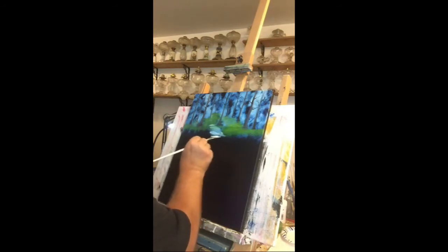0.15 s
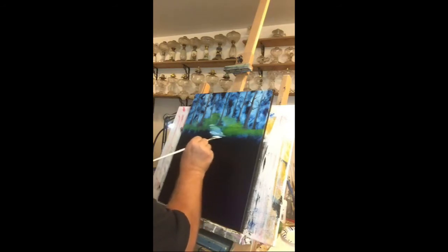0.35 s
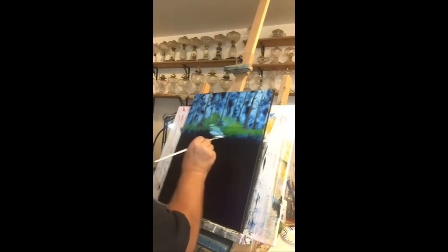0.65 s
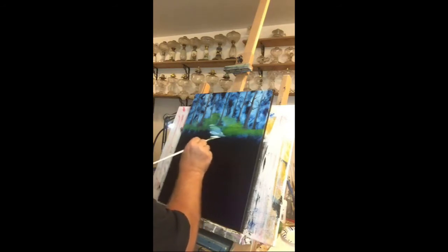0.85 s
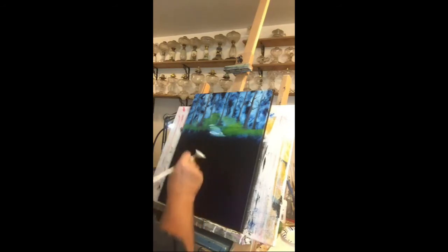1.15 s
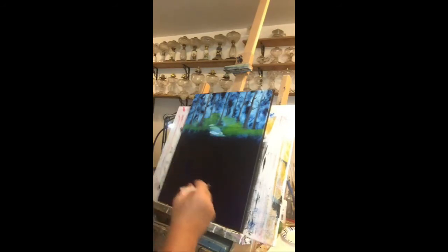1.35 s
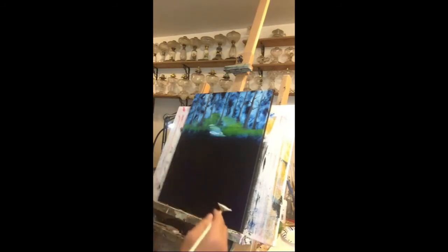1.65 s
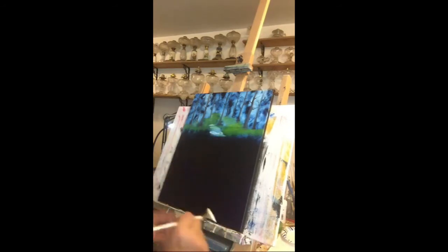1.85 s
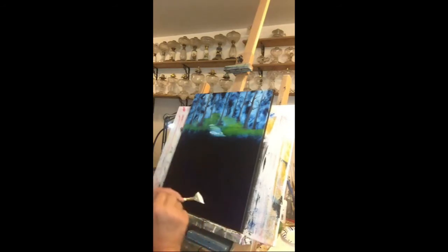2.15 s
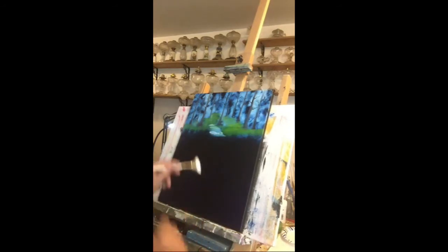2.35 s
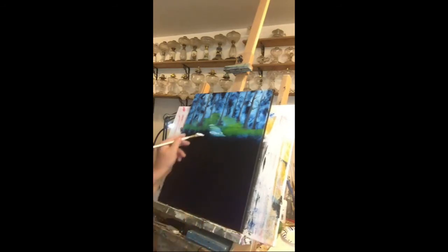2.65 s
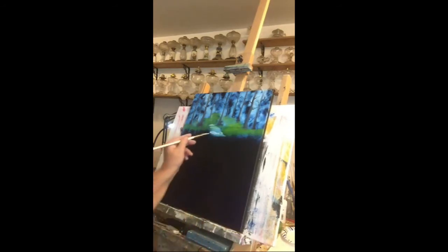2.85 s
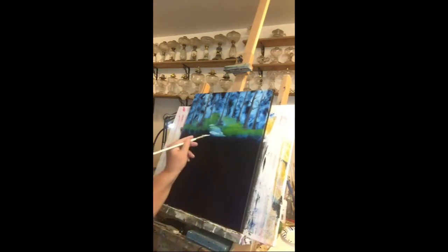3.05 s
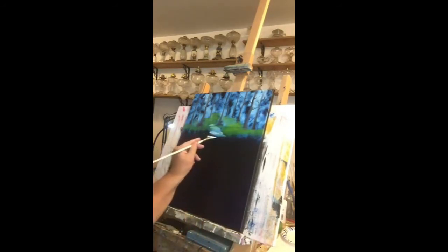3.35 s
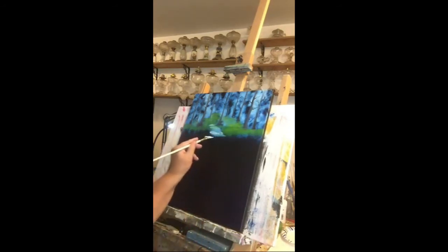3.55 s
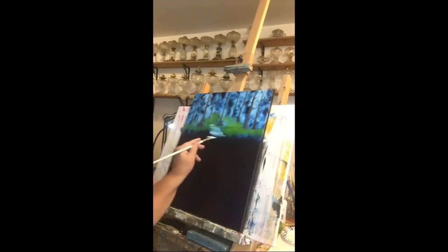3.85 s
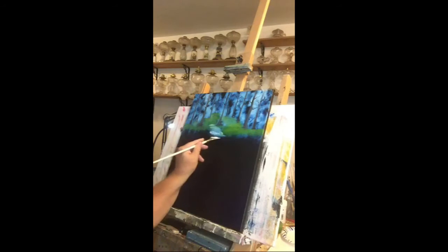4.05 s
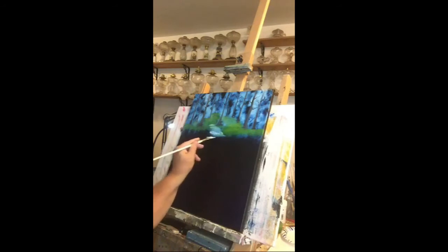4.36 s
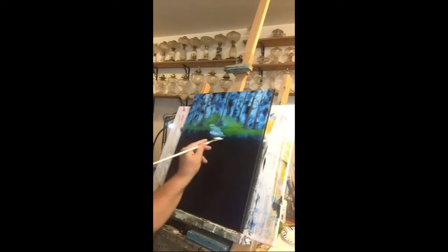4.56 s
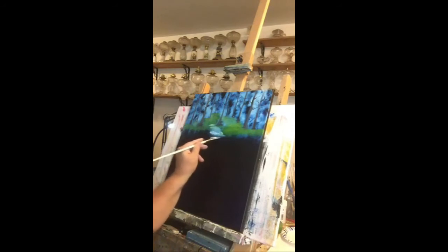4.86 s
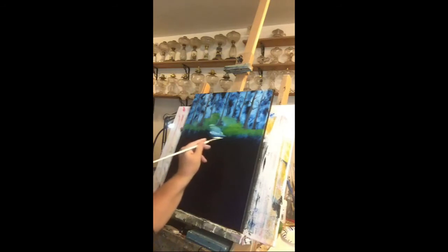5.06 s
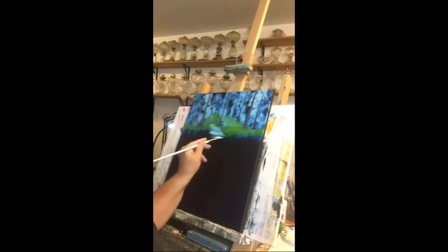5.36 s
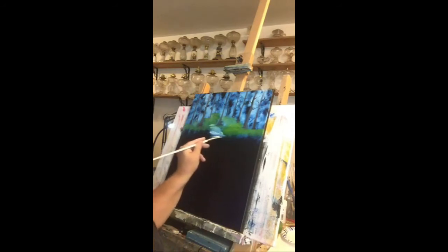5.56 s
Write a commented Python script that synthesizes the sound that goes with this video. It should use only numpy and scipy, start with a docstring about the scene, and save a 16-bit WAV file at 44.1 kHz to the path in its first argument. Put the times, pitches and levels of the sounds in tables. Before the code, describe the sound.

A steady low motor hum and a soft rush of fan air fill a small studio throughout, heard from beside an easel. From the start, a stiff bristle brush makes about five short, quiet, scratchy strokes on a stretched canvas, which resonates faintly. The run ends with a dull dab just before 1 second. At about 1.2 seconds comes a tiny high squeak with a faint thud. From 1.3 to 2.3 seconds, fingers slide and tick softly along the brush handle. At about 2.4 seconds the handle raps on the wooden easel: one sharp click with a brief ring, the loudest event. Little but the hum remains until 3.6 seconds, when a second run of quick, dry strokes begins, roughly five a second and a little uneven, continuing to the end at about 5.6 seconds. The room sounds close, with very little echo.

```python
"""Stiff bristle brushes scratch two runs of short strokes on a stretched canvas in a small studio.
Bristles catch on the weave and flick free; the cloth resonates. The first run ends with a dab.
In the pause the hand draws back with a tiny squeak and turns a brush round, fingers sliding and
ticking; the handle raps sharply on the easel. A motor hums and a fan blows softly throughout."""
import sys
import numpy as np
from scipy import signal
from scipy.fft import rfft, irfft
from scipy.io import wavfile
from scipy.ndimage import uniform_filter1d

SR = 44100
rng = np.random.default_rng(int(sys.argv[2]) if len(sys.argv) > 2 else 0)


def master_out(mix):
    """Clip the mix to full scale and print it as 16-bit PCM to the path in sys.argv[1]."""
    frames = np.transpose(np.atleast_2d(mix))
    ceiling = np.clip(frames, -1, 1)
    pcm = np.round(ceiling * 32767).astype(np.int16)
    wavfile.write(sys.argv[1], SR, pcm)


N = 251811
FIRM_STROKE_DB = -52.5

# Brush strokes. Each row: start in seconds, length in seconds, level in dB, lean (rise from start
# to end) in dB, treble against the scrape in dB.
FIRST_STROKES = [ (-0.037, 0.097, -53, -6.5, -11.5), (0.128, 0.11, -53.5, -17.5, -11.5),
                 (0.329, .132, -52, 2, -10), (0.553, 0.12, -49.5, -8, -7), (0.782, 0.088, -54.5, -5.5, -6),
                 ]
SECOND_STROKES = [ (3.595, 0.14, -53, -4.5, -8.5), (3.839, 0.057, -71, 11, -9), (4.027, 0.15, -51, 8.5, -8),
                  (4.257, .021, -74.5, -3, -20), (4.347, 0.026, -67, 2, -20), (4.432, 0.15, -52, 10, -3),
                  (4.682, 0.088, -55, 1, -3.5), (4.849, 0.13, -53, 14.5, -4),
                  (5.039, 0.14, -53.5, 9.5, -3.5), (5.246, 0.12, -53.5, -2.5, -8),
                  (5.41, 0.025, -63, -9, -17), (5.444, 0.038, -59, 11, -11), (5.529, 0.036, -56, 14, -6), ]
# Fingers sliding on the handle. Each row: start in seconds, length in seconds, level in dB, lean in dB.
FINGER_SLIDES = [ (1.28, 0.1, -68, -1), (1.617, 0.16, -58.5, 8), (1.806, 0.21, -56, 4), (2.0, .17, -53, 4),
                 (2.208, 0.095, -54, -3), ]
# Dabs on the canvas. Each row: start in seconds, relative level in dB, thud weight in dB.
DAB_HITS = [(0.592, -24, -8), (0.9392, -20, -7), (0.945, -22.5, -10), (.955, -26, -8), (1.202, -55, 28)]
# Handle on easel, fingers on handle. Each row: start in seconds, relative level in dB.
RAP_HITS = [(2.4459, 1.5), (2.4474, -1), (2.45, 1.5), (2.453, -8), (2.4585, -6)]
FINGER_HITS = [(1.525, -45), (1.802, -44), (1.971, -47), (2.966, -56)]
# Handle and easel modes. Each row: frequency in Hz, relative level in dB, uncapped T60 in seconds.
EASEL_MODES = [(195, -3, 0.19), (213, -14, 0.16), (292.6, -10, 0.2), (473, -14.5, .16), (1055, -14, .25),
               (1146, -8.5, 0.12), (1494, -5.5, .15), (1811, -2.5, 0.17), (1800, 1.5, .15), (3054, -5, .16),
               (3066, -3, 0.11), (3490, -2, .15), (3700, -5, .15), (3630, 0, .16), (3570, -0.5, 0.19),
               (3918, -4, 0.13), (3900, -5.5, 0.14), (4210, 0, 0.17), (4250, -2, 0.2), (4645, -5, .2),
               (5020, -6, 0.2), (6400, -8.5, .1), (6360, -10.5, .15), (7300, -12, .13)]

# Source spectra. Each row: frequency in Hz, relative spectral density in dB.
BRISTLE_SPECTRUM = [(700, -11.5), (1100, 0), (1700, 2), (2200, -1.5), (2600, 3.5), (3200, -3.5),
                    (4200, -3.5), (4800, -6), (6500, -9), (9000, -13.5), (12500, -17), (15500, -21)]
DAB_SPECTRUM = [(200, -11), (400, -4), (700, 5), (1200, -0.5), (1600, 5.5), (2000, -3), (2500, -1),
                (3300, -5.5), (4200, -26), (5000, -13.5), (5600, -26), (10000, -33), (15000, -50)]
RAP_SPECTRUM = [(60, -60.5), (125, -35.5), (175, -4.5), (235, -13), (300, -11.5), (420, -26), (510, -13),
                (650, -28), (850, -9.5), (1100, -7), (1850, -3), (2600, -8), (3200, -3), (4200, -3),
                (5200, -6), (7000, -10.5), (9500, -16.5), (12800, -18.5), (15500, -20.5)]
SLIDE_SPECTRUM = [(300, -9), (880, -3), (1500, 0), (2120, 2), (2670, -24), (3050, -21.5), (4160, -27),
                  (5000, -36), (5800, -38), (9000, -37.5), (15000, -41)]
TICK_SPECTRUM = [(500, -22), (2500, -12), (4000, 6), (6500, -3.5), (8000, -16), (15000, -24)]
FAN_SPECTRUM = [(20, -25), (60, -25), (95, -6), (170, 1), (330, -1.5), (480, -9), (800, -8), (1100, -5.5),
                (1500, -8.5), (1800, -13), (2120, -14), (2320, -28), (2750, -39), (3800, -44), (9000, -45),
                (11000, -43), (15000, -43)]

# Resonances. Each row: centre in Hz, width in Hz, lift in dB.
CANVAS_RESONANCES = [(1120, 70, 5.5), (1290, 36, 3), (1620, 61, 3), (1647, 91, 7), (1990, 49, 6.5),
                     (2341, 33, 10), (2750, 70, 2), (3512, 70, 5.5), (4120, 70, 8), (5040, 150, 1.5),
                     (5670, 98, -9)]
FIRST_TUFT_RESONANCES = [(1969, 410, -1), (2590, 350, -2.5), (3530, 300, 2.5), (4160, 930, 3)]
SECOND_TUFT_RESONANCES = [(2571, 320, -7.5), (4120, 700, -3.5), (4800, 250, 0)]
DRUM_RESONANCE = [(184.4, 28, 15)]  # lowest note of the cloth
HANDLE_RESONANCES = [(3090, 94, 17.5), (3430, 65, 18.5), (4065, 120, 19.5), (5650, 89, 14), (5980, 70, 14)]
DUCT_RESONANCES = [(187, 8.3, 7.5), (239.3, 3.4, 6), (293, 16, 2), (397.6, 34, 10), (647.5, 26, 13),
                   (696, 32, 13.5), (945, 29, 6), (1141, 20, 5.5), (1320, 21, 12), (1700, 12, 2),
                   (2080, 14, 6.5)]  # fan casing and duct

# Studio decay. Each row: frequency in Hz, T60 in seconds.
ROOM_DECAY = [(200, .36), (700, .34), (1400, 0.22), (3000, 0.21), (6000, 0.22), (10000, 0.21),
              (15000, 0.18)]


def brush(strokes, tuft, body_db, body_follow, scrape_db, hiss_db, fizz_db, flicks_per_s=5000):
    """Bristles catch on the weave and flick free; the canvas answers, fast motion adds hiss and fizz."""
    sizes = gain_of(3 * np.minimum(rng.exponential(1, N), 4)) * rng.choice([-1, 1], N)
    flicks = sizes * (rng.random(N) < flicks_per_s / SR) * gain_of(0.9 * wander(rate_hz=60))
    scratch = colour(flicks, BRISTLE_SPECTRUM, list(CANVAS_RESONANCES) + list(tuft))
    scratch = studio(scratch, near_db=-2.5, tail_db=-3, near_t60_s=0.045)
    scratch = moving_contact(scratch, depth_db=3)
    level_db, treble_db = run_envelope(strokes)
    # the low-mid body of each stroke swells less than its bright scrape
    body = band(scratch, 340, 2400) * gain_of(body_db + body_follow * (level_db - FIRM_STROKE_DB))
    scrape = band(scratch, 2274, 4300) * gain_of(level_db + scrape_db)
    hiss = band(scratch, 4490, 6400) * gain_of(level_db + 0.5 * treble_db + hiss_db)
    fizz = band(scratch, 6530, 17000) * gain_of(level_db + treble_db + fizz_db)
    return body + scrape + hiss + fizz


def run_envelope(strokes, brighten_db=4):
    """Level and relative treble of a run, in dB per sample. Mid-stroke is faster, so brighter."""
    scrape_power, fizz_power = np.zeros((2, N))
    for start_s, length_s, db, lean_db, treble_db in strokes:
        level_db, slowness = stroke(start_s, length_s, db, lean_db)
        scrape_power += gain_of(level_db) ** 2
        fizz_power += gain_of(level_db + treble_db - brighten_db * slowness) ** 2
    return 10 * np.log10(scrape_power), 10 * np.log10(fizz_power / scrape_power)


def stroke(start_s, length_s, db, lean_db, arch_db=3.5, land_db_per_s=744, lift_db_per_s=518):
    """One rub lands, arches, lifts off. Returns level in dB and slowness (0 midway, 1 at the ends)."""
    t = np.arange(N) / SR - start_s
    position = np.clip(t / length_s, 0, 1) - 0.5
    slowness = abs(2 * position) ** 1.4
    fade_db = land_db_per_s * np.maximum(-t, 0) + lift_db_per_s * np.maximum(t - length_s, 0)
    level_db = db + lean_db * position - arch_db * slowness - fade_db
    return np.maximum(level_db, -160), slowness


def moving_contact(x, depth_db, patch_bins=3, patch_frames=16):
    """Narrow resonances come and go as the contact moves."""
    spectra = signal.stft(x, nperseg=512, noverlap=384)[2]
    patches = uniform_filter1d(rng.standard_normal(spectra.shape), patch_bins, axis=0)
    patches = unit_rms(uniform_filter1d(patches, patch_frames, axis=1))
    return signal.istft(spectra * gain_of(depth_db * patches), nperseg=512, noverlap=384)[1][:N]


def canvas_drum(gain_db=-58, follow=0.083):
    """The cloth rumbles softly, swelling under each stroke and ringing briefly."""
    level_db, _ = run_envelope(list(FIRST_STROKES) + list(SECOND_STROKES))
    push = gain_of(follow * (level_db - FIRM_STROKE_DB)) * rng.standard_normal(N)
    spectrum = [(60, -49), (140, -8), (200, 0), (300, -7), (600, -23.5), (3000, -71.5)]
    return gain_of(gain_db) * colour(push, spectrum, DRUM_RESONANCE)


def dabs(thud_hz=200, thud_t60_s=0.1, thud_db=-28, tick_db=-2):
    """The tuft lands with a dull tick; the stretched cloth thuds."""
    ticks, thuds = np.zeros((2, N))
    t = np.arange(SR // 4) / SR
    for start_s, db, weight_db in DAB_HITS:
        add(ticks, start_s, gain_of([db]))
        envelope = gain_of(db + weight_db + thud_db - 60 * t / thud_t60_s)
        add(thuds, start_s, envelope * np.sin(2 * np.pi * thud_hz * t))
    ticks = studio(colour(ticks, DAB_SPECTRUM), near_db=7, tail_db=-3.5, near_t60_s=0.074)
    return gain_of(tick_db) * ticks + thuds


def easel_rap(crack_db=3.5, ring_db=-24.5, max_t60_s=0.24, attack_s=0.00023):
    """Wood on wood: the handle chatters as it lands; handle and easel ring."""
    contacts, ring = np.zeros((2, N))
    t = np.arange(SR // 2) / SR
    for start_s, db in RAP_HITS:
        add(contacts, start_s, gain_of([db]))
    for hz, db, t60_s in EASEL_MODES:
        envelope = gain_of(db - 60 * t / min(t60_s, max_t60_s)) * (1 - np.exp(-t / attack_s))
        add(ring, RAP_HITS[0][0], envelope * np.sin(2 * np.pi * (hz * t + rng.random())))
    crack = studio(colour(contacts, RAP_SPECTRUM), near_db=4, tail_db=2, near_t60_s=0.075)
    return gain_of(crack_db) * crack + gain_of(ring_db) * ring


def fingers(uneven_db=2, slip_hz=14):
    """Skin slides unevenly along the handle; fingers tick against it."""
    grip = sum(gain_of(stroke(*slide)[0]) for slide in FINGER_SLIDES)
    rub = colour(rng.standard_normal(N), SLIDE_SPECTRUM, HANDLE_RESONANCES)
    rub = unit_rms(moving_contact(rub, depth_db=3.5))
    ticks = np.zeros(N)
    for start_s, db in FINGER_HITS:
        add(ticks, start_s, gain_of([db]))
    ticks = colour(ticks, TICK_SPECTRUM, HANDLE_RESONANCES)
    ticks = studio(ticks, near_db=3, tail_db=-2, near_t60_s=0.099)
    return rub * grip * gain_of(uneven_db * wander(slip_hz)) + ticks


def squeak(peak_s=1.245, half_width_s=0.024, centre_hz=8450, width_hz=900, level_db=-65):
    """A tiny high squeak as the hand draws back."""
    spectrum = [(100, -29), (8000, 0), (15000, -14)]
    whistle = colour(rng.standard_normal(N), spectrum, [(centre_hz, width_hz, 28)])
    envelope = np.exp(-((np.arange(N) / SR - peak_s) / half_width_s) ** 2)
    return gain_of(level_db) * unit_rms(whistle) * envelope


def fan(hum_hz=120, hum_db=-48.5, rush_db=-50, waver_db=0.4):
    """Mains hum of the motor and air rushing through a duct, both wavering slightly."""
    hum = unit_rms(np.sin(2 * np.pi * hum_hz * np.arange(N) / SR))
    hum *= gain_of(hum_db + waver_db * wander(rate_hz=7))
    rush = unit_rms(colour(rng.standard_normal(N + SR), FAN_SPECTRUM, DUCT_RESONANCES)[SR:])
    rush *= gain_of(rush_db + waver_db * wander(rate_hz=3))
    return hum + rush


def studio(x, near_db, tail_db, near_t60_s, echoes_per_s=4000, onset_s=0.0015):
    """Direct sound, dense echoes off easel and shelves, short room tail."""
    t = np.arange(SR // 2) / SR
    near, tail = rng.standard_normal((2, len(t))) * (1 - np.exp(-(t / onset_s) ** 2))
    near *= (rng.random(len(t)) < echoes_per_s / SR) * gain_of(-60 * t / near_t60_s)
    hz, frame_s, spectra = signal.stft(tail, SR, nperseg=256)
    decay = gain_of(-60 * frame_s / curve_at(ROOM_DECAY, hz)[:, None])
    tail = signal.istft(spectra * decay, SR)[1][:len(t)]
    echoes = gain_of(near_db) * near / np.linalg.norm(near)
    echoes += gain_of(tail_db) * tail / np.linalg.norm(tail)
    return x + signal.fftconvolve(x, echoes)[:N]


def colour(x, spectrum, resonances=(), fft_size=16384):
    """Minimum-phase filter of unit energy with the given spectrum and resonances."""
    hz = abs(np.fft.fftfreq(fft_size, 1 / SR))
    lift_db = sum(db / (1 + (2 * (hz - centre_hz) / width_hz) ** 2)
                  for centre_hz, width_hz, db in resonances)
    log_gain = np.log(gain_of(curve_at(spectrum, hz) + lift_db))
    response = np.exp(np.conj(signal.hilbert(log_gain)))
    taps = np.fft.ifft(response).real[:fft_size // 2]
    return signal.fftconvolve(x, taps / np.linalg.norm(taps))[:len(x)]


def band(x, low_hz, high_hz):
    """Soft-edged band-pass, scaled to RMS 1."""
    hz = np.fft.rfftfreq(len(x), 1 / SR) + 1
    passed = rfft(x) / (1 + (low_hz / hz) ** 16) / (1 + (hz / high_hz) ** 16)
    return unit_rms(irfft(passed, len(x)))


def wander(rate_hz):
    """Smooth random drift of RMS 1, rolling off at rate_hz."""
    hz = np.fft.rfftfreq(N, 1 / SR)
    return unit_rms(irfft(rfft(rng.standard_normal(N)) * np.exp(-(hz / rate_hz) ** 2), N))


def curve_at(points, hz):
    """Interpolates (Hz, value) points over log frequency."""
    points_hz, values = np.transpose(points)
    return np.interp(np.log(hz + 1), np.log(points_hz + 1), values)


def add(mix, start_s, sound):
    """Mixes a sound in at start_s."""
    part = mix[round(start_s * SR):][:len(sound)]
    part += sound[:len(part)]


def gain_of(db):
    """dB to amplitude."""
    return 10 ** (np.asarray(db) / 20)


def unit_rms(x):
    """Scales to RMS 1."""
    return x / np.sqrt(np.mean(x ** 2) + 1e-20)


def scene():
    """Mono mix, heard beside the easel."""
    first = brush(FIRST_STROKES, FIRST_TUFT_RESONANCES, body_db=-51, body_follow=0.57,
                  scrape_db=-0.95, hiss_db=-3.5, fizz_db=0.5)
    second = brush(SECOND_STROKES, SECOND_TUFT_RESONANCES, body_db=-48, body_follow=0.48,
                   scrape_db=-0.77, hiss_db=-4.5, fizz_db=-1.45)
    return (first + second + canvas_drum() + dabs() + fingers() + easel_rap() + squeak() + fan())[None]


def record(dry, ceiling=0.9, cutoff_hz=15750):
    """Soft clip, then low-pass."""
    rounded = dry / (1 + (dry / ceiling) ** 6) ** (1 / 6)
    lowpass = signal.firwin(511, cutoff_hz, window=("kaiser", 9), fs=SR)
    return signal.oaconvolve(rounded, lowpass[None], "same")


dry = scene()
out = record(dry)
master_out(out)
```